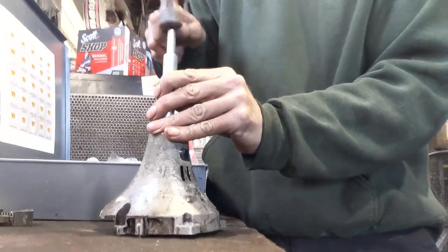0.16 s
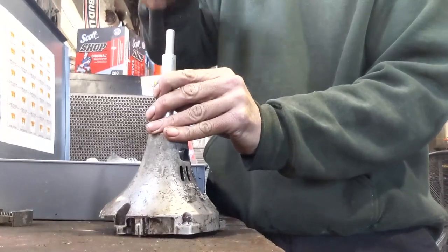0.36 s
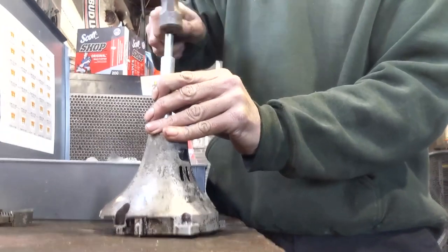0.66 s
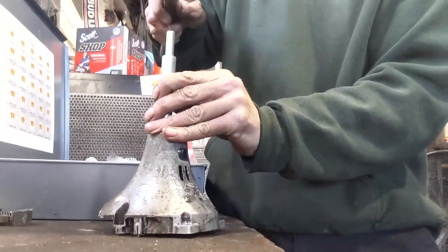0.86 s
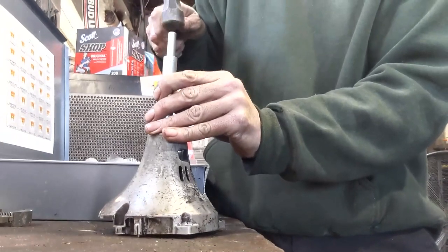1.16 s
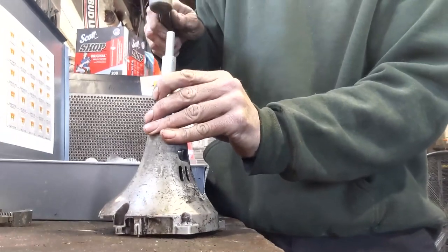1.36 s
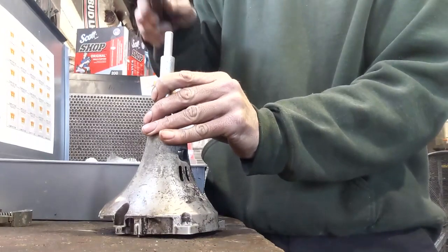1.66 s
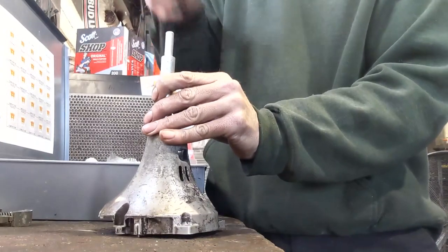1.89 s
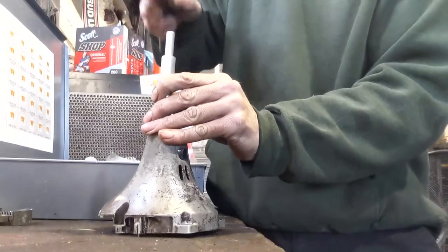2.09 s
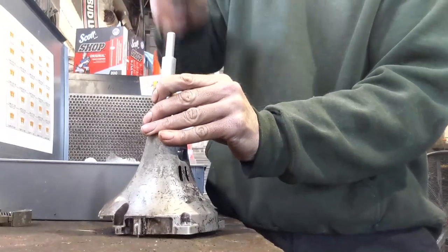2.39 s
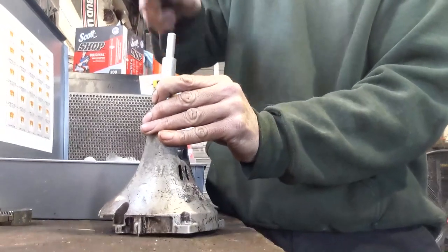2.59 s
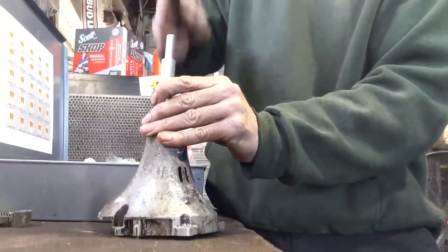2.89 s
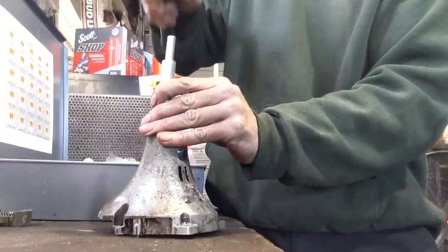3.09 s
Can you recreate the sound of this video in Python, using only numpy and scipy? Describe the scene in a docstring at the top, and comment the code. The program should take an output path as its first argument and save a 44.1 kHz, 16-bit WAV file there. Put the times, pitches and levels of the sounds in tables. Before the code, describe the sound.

Steel hammer blows on a punch, sharp metallic cracks with short ringing and boomy room echo

```python
"""Hammer and punch in a workshop

A steel hammer drives a metal punch into a cast housing on a workbench in a bare, echoing workshop.
Random impulses excite damped modes under a noise crack; five blows also bounce once, the head sings
on as decaying sines, a near wall slaps back, and noise dying band by band forms the echo over a floor.
The recorder turns loud passages down; slow swings and sudden jumps join its signal before overload."""
import sys
import numpy as np
from scipy import signal
from scipy.fft import rfft, irfft
from scipy.io import wavfile

SR = 44100
rng = np.random.default_rng(int(sys.argv[2]) if len(sys.argv) > 2 else 0)


def persist_wave(psi):
    """Save psi, clipped to +-1, as 16-bit WAV."""
    counts = np.round(np.clip(psi, -1, 1) * 32767).astype(np.int16)
    wavfile.write(sys.argv[1], SR, np.atleast_2d(counts).T)


N = 143325
PRE = SR // 2   # samples of lead-in, so that a blow before the start leaves its tail
M = N + PRE
T = (np.arange(M) - PRE) / SR   # time/s


def amp(db):
    """Level definition: an amplitude ratio is 10 to the power dB/20."""
    return 10 ** (np.asarray(db) / 20)


def at_hz(points, hz):
    """Logarithmic frequency scale: interpolate a table of (f/Hz, value) along it."""
    p = np.array(points, float)
    return np.interp(np.log(np.maximum(hz, 1)), np.log(np.maximum(p[:, 0], 1)), p[:, 1])


def clicks(s, size):
    """Impulse excitation: one sample of the given size at each time."""
    out = np.full(M, 1e-18)   # not quite zero, which keeps the filters fast
    out[(np.asarray(s) * SR).astype(int) + PRE] = size
    return out


def fade(x, t60):
    """Exponential decay: each impulse dies away by 60 dB in t60."""
    return signal.lfilter([1], [1, -amp(-60 / (t60 * SR))], x)


def ring(x, hz, t60):
    """Damped resonance: a unit impulse sets a decaying sine of initial height 1 ringing."""
    r, w = amp(-60 / (t60 * SR)), 2 * np.pi * hz / SR
    return signal.lfilter([0, np.sin(w)], [1, -2 * r * np.cos(w), r * r], x)


def noise_pair(gain):
    """Spectral shaping: two unrelated noises, jointly of rms 1, from a gain at each frequency."""
    spectra = rfft(rng.standard_normal((2, M))) * gain(np.fft.rfftfreq(M, 1 / SR))
    x = irfft(spectra, M)
    return x / x.std()


def coloured(spectrum):
    """Spectral density: noise follows a table of (f/Hz, relative level/dB)."""
    return noise_pair(lambda hz: amp(at_hz(spectrum, hz)))


# Hammer blows: t/s, contact strength/dB, chatter length/s, crack level/dB, broad echo level/dB,
# punch-pitched echo level/dB, echo treble slope/(dB per octave)
BLOW_TABLE = [(-.27, 8, .008, -5.5, -13, -25, 1), (0.206, 9.5, 0.0076, -7.5, -10.5, -22, 1),
              (0.689, 13, 0.012, -9, -8, -21.5, 1.5), (1.609, 4.5, 0.0092, -25, -26, -26.5, -1.5),
              (2.051, 12, .011, -9.5, -7, -30.5, 1.16), (2.524, 14, .006, -4, -7.5, -27, 1.48),
              (2.995, 14, 0.012, -12, -6.5, -20, 1.5)]
# How each blow lands: punch brightness/(dB per octave), extra level into the bench/dB
LANDING_TABLE = [(-2, 0), (1.4, 0), (2.6, 0.5), (-1.5, -0.5), (2, 1.5), (2.2, -2), (2.6, 0)]
# Bounces of the punch: t/s, contact strength/dB
BOUNCE_TABLE = [(0.238, 6), (.720, 7.5), (2.079, 12), (2.552, 7), (3.024, 5.5)]
BOUNCE_S, BOUNCE_CRACK_DB, BOUNCE_TILT_DB = 0.00067, -7.5, -1   # tilt in dB per octave
# Modes of punch and housing, damped by the hand: f/Hz, relative level/dB, t60/s
PUNCH_MODES = [(977, 6.5, 0.011), (1310, 0.5, 0.013), (2020, -11.5, 0.019), (3392, -11.5, .03),
               (5280, -2, 0.029), (5758, 1, 0.02), (6920, -6.5, 0.019), (7220, -2, 0.023),
               (7754, -1, 0.022), (8140, -5, 0.015), (9170, -11, 0.022), (10150, -11, .03),
               (11300, -24.5, .03), (14100, -5, .02)]
# Spectrum of the crack: f/Hz, relative level/dB
CRACK_SPECTRUM = [(88, -39), (150, -8), (1140, -6), (1650, -9), (3230, -13.5), (3850, -18), (10100, -12.5),
                  (14400, -18), (16500, -40)]
RISE_S, CRACK_FADE_S, PUNCH_DB = 0.00058, 0.0032, -19
CHATTER_PER_S = 3000   # mean rate of random impulses


def contact():
    """Impact excitation: chattering impulses drive the punch modes beneath a burst of noise."""
    out, hiss = np.zeros((2, M)), coloured(CRACK_SPECTRUM)
    hits = [(*blow[:4], landing[0]) for blow, landing in zip(BLOW_TABLE, LANDING_TABLE)]
    hits += [(s, db, BOUNCE_S, BOUNCE_CRACK_DB, BOUNCE_TILT_DB) for s, db in BOUNCE_TABLE]
    for s, db, length, crack_db, tilt_db in hits:
        part = slice(int(s * SR) + PRE, int((s + .2) * SR) + PRE)
        age = np.maximum(T[part] - s, 0)
        # the push rises, holds for the chatter length, then decays
        rise = np.minimum(age / RISE_S, 1) ** 2
        push = amp(db) * rise * np.exp(-np.maximum(age - length, 0) / CRACK_FADE_S)
        struck = rng.random(len(age)) < CHATTER_PER_S / SR
        chatter = push * rng.standard_normal((2, len(age))) * struck
        out[:, part] += amp(crack_db) * push * hiss[:, part]
        for hz, mode_db, t60 in PUNCH_MODES:
            level_db = PUNCH_DB + mode_db + tilt_db * np.log2(hz / 4000)
            out[:, part] += amp(level_db) * ring(chatter, hz, t60)
    return out


# Lines of the hammer head: f/Hz
HAMMER_HZ_TABLE = [1813, 1862, 3962, 4004, 6524, 9643, 13380]
# One row per line: family index, left level/dB, right level/dB (added to the family's), t60/s
HAMMER_LINES = [(0, -1, -14.5, 1.71), (0, -24.5, -13.5, 2.3), (1, -1.5, -37, 1.3), (1, 1.5, -15.5, 1.28),
                (2, 6, -24, 0.71), (3, 2.5, 7, 0.86), (4, 9.5, -16, 0.5)]
# One row per blow: starting level/dB of each of the five line families, lowest first
RING_LEVELS = [(-30, -36, -50, -55.5, -38), (-28.5, -40, -28.5, -48.5, -26),
               (-33.5, -36.5, -24.5, -44, -24.5), (-59, -71.5, -51, -79, -63),
               (-32.5, -36, -27, -40.5, -31), (-32.5, -37, -29, -36, -25.5), (-23.5, -34, -22, -35.5, -34)]


def hammer():
    """Free vibration: the head rings in thin lines, each blow stopping the old ring for a new one."""
    s, levels = np.transpose(BLOW_TABLE)[0], np.array(RING_LEVELS)
    last = np.maximum(np.searchsorted(s, T) - 1, 0)   # index of the latest blow
    age = np.maximum(T - s[last], 0)
    phase = rng.uniform(0, 2 * np.pi, (len(s), len(HAMMER_LINES)))
    out = np.zeros((2, M))
    for k, (hz, (family, left, right, t60)) in enumerate(zip(HAMMER_HZ_TABLE, HAMMER_LINES)):
        decay = amp(levels[last, round(family)] - 60 * age / t60)
        line = decay * np.sin(2 * np.pi * hz * age + phase[last, k])
        out += amp([[left], [right]]) * line
    return out


# Modes of the bench: f/Hz, relative level/dB, t60/s
BENCH_MODES = [(65.7, -25.5, .15), (105.1, -17.5, .2), (169, -26, 0.3), (241.2, -20, 0.17),
               (371, -26, 0.076)]


def bench():
    """Modal response: each blow kicks the low bench modes with random, mostly negative strength."""
    s, db = np.transpose(BLOW_TABLE)[:2]
    force = amp(db + np.transpose(LANDING_TABLE)[1])
    kicks = rng.normal(-0.7, 0.26, (len(s), 2, len(BENCH_MODES)))
    out = np.zeros((2, M))
    for k, (hz, mode_db, t60) in enumerate(BENCH_MODES):
        struck = np.array([clicks(s, force * kicks[:, side, k]) for side in range(2)])
        out += amp(mode_db) * ring(struck, hz, t60)
    return out


SLAP_S, SLAP_LOW_HZ, SLAP_HIGH_HZ, SLAP_DB = .0205, 635, 1120, -7.5


def wall_slap(direct):
    """Specular reflection: a near wall returns a delayed, band-limited copy of the contact."""
    wall = signal.butter(2, [SLAP_LOW_HZ, SLAP_HIGH_HZ], "band", fs=SR, output="sos")
    return amp(SLAP_DB) * np.roll(signal.sosfilt(wall, direct), int(SLAP_S * SR), axis=1)


# Spectrum of the broad echo: f/Hz, relative level/dB
ECHO_SPECTRUM = [(24, -20), (40, -2.5), (104, -0.5), (167, -5), (372, -7), (600, -7), (760, -2.5),
                 (1150, -16), (1720, -26), (2000, -21.5), (2450, -23.5), (2900, -28.5), (3740, -30),
                 (4700, -27), (6300, -23.5), (9690, -22), (12500, -33), (15500, -37.5), (16500, -44.5)]
# Decay of the long echo: f/Hz, t60/s
ECHO_DECAY = [(60, 0.76), (250, 0.77), (800, 0.83), (2500, 0.85), (6000, 0.63), (10000, 0.39),
              (15000, 0.45)]
EARLY_DB, EARLY_T60_S, BUILD_S = 3, 0.11, 0.012   # early part against the long one, build-up time
BLUR = 0.06   # width of a punch mode in the echo, as a share of its pitch


def punch_lines(hz):
    """Resonance curves: gain of noise gathered around the punch modes."""
    power = 0
    for f, db, _ in PUNCH_MODES:
        power = power + amp(2 * db) / f / (1 + ((hz - f) / (BLUR * f)) ** 2) ** 2
    return np.sqrt(power)


def workshop():
    """Diffuse reverberation: broad and punch-pitched noise dies band by band, early part over long."""
    s, broad_db, punch_db, treble_db = np.transpose(BLOW_TABLE)[[0, 4, 5, 6]]
    broad = [coloured(ECHO_SPECTRUM), coloured(ECHO_SPECTRUM)]
    pitched = [noise_pair(punch_lines), noise_pair(punch_lines)]
    edges = 35 * 2 ** np.arange(0, 9, 1 / 3)   # third-octave bands, Hz
    smooth = np.exp(-1 / (BUILD_S * SR))
    out = np.zeros((2, M))
    for k, (low, high) in enumerate(zip(edges, edges[1:])):
        hz = np.sqrt(low * high)
        band = signal.butter(2, [low, high], "band", fs=SR, output="sos")
        for db, noise in [(broad_db, broad), (punch_db, pitched)]:
            kick = clicks(s, amp(db + treble_db * np.log2(hz / 1000)))
            swell = fade(kick, at_hz(ECHO_DECAY, hz)) + amp(EARLY_DB) * fade(kick, EARLY_T60_S)
            envelope = signal.lfilter([1 - smooth], [1, -smooth], swell)
            out += envelope * signal.sosfilt(band, noise[k % 2])   # neighbours use separate noise
    return out


# Spectrum of the steady floor: f/Hz, relative level/dB
FLOOR_SPECTRUM = [(12, -29.5), (20, -12), (175, -24), (857, -37), (1670, -47), (1820, -39.5), (1980, -55),
                  (4070, -46), (15500, -58)]


def noise_floor():
    """Stationary noise: a steady coloured background, at -55.5 dB rms before the microphones."""
    return amp(-55.5) * coloured(FLOOR_SPECTRUM)


# Phase by which the left leads: f/Hz, phase/rad
PHASE_LEAD = [(0, 0), (350, -1.5), (1000, -0.14), (3600, 1.6), (5800, -6), (8000, -8), (16500, -31.5)]
# Likeness of left and right: f/Hz, share from 0 to 1
LIKENESS = [(40, 1), (300, 0.61), (1000, 0.46), (4000, 0.39), (12000, 0.23)]
# Left minus right: f/Hz, level difference/dB
LEFT_OVER_RIGHT = [(60, 4.5), (200, 1.5), (700, 6), (2400, 5), (6000, 5), (15000, 6)]


def microphones(pair):
    """Partial coherence: the right port mixes the left's phase-shifted sound with sound of its own."""
    hz = np.fft.rfftfreq(M, 1 / SR)
    left, own = rfft(pair)
    alike = np.clip(at_hz(LIKENESS, hz), 0, 1)
    shifted = left * np.exp(-1j * np.interp(hz, *np.transpose(PHASE_LEAD)))
    right = alike * shifted + np.sqrt(1 - alike ** 2) * own
    side = amp(at_hz(LEFT_OVER_RIGHT, hz) / 2)   # half the difference on each side
    return irfft(np.array([left * side, right / side]), M)


# Slow swings after each blow, before the high-pass:
# t/s, upswing height, upswing peak time/s, downswing height, downswing peak time/s
SWING_TABLE = [(-.27, 0.43, 0.011, 0.23, 0.045), (.206, 0.46, 0.014, 0.27, 0.058),
               (0.692, 0.58, 0.0074, 0.17, 0.07), (1.611, -0.11, 0.013, -0.037, 0.043),
               (2.055, 0.64, 0.025, 0.28, 0.072), (2.525, 0.47, 0.0087, 0.21, 0.076),
               (2.997, 0.43, 0.012, 0.18, 0.064)]
# Sudden jumps, before the high-pass: t/s, left height, right height, rise/s, fall/s
JUMP_TABLE = [(0.199, 0.24, 0.035, .0003, .02), (1.369, -0.036, -0.03, 0.00021, 0.042),
              (2.0437, 0.23, 0.0, 0.00041, 0.018), (2.514, 0.26, 0.01, 0.0012, 0.023)]
RIGHT_HEIGHT, RIGHT_TIME, COUPLING_HZ = 0.88, 0.91, 1   # right swings: share of height and of time


def lurch():
    """High-pass coupling: a quick upswing, a slower downswing and sudden jumps pass through it."""
    out = np.zeros((2, M))
    for s, up, up_s, down, down_s in SWING_TABLE:
        age = np.maximum(T - s, 0) / [[1], [RIGHT_TIME]]
        upswing = up * (age / up_s * np.exp(1 - age / up_s)) ** 2
        downswing = down * age / down_s * np.exp(1 - age / down_s)
        out += [[1], [RIGHT_HEIGHT]] * (upswing - downswing)
    for s, left, right, rise, fall in JUMP_TABLE:
        age = np.maximum(T - s, 0)
        jump = (1 - np.exp(-age / rise)) * np.exp(-(age / fall) ** 2)
        out += np.outer([left, right], jump)
    return signal.lfilter(*signal.butter(1, COUPLING_HZ, "high", fs=SR), out)[:, PRE:]


def scene():
    """Superposition: microphone sound and the hammer's own stereo lines add, without the lead-in."""
    direct = contact()
    heard = microphones(direct + wall_slap(direct) + bench() + workshop() + noise_floor())
    return (heard + hammer())[:, PRE:]


THRESHOLD_DB, SQUEEZE = -39.5, 0.39   # SQUEEZE: dB of cut per dB above the threshold
LEVEL_FALL_DB_PER_S, LISTEN_S, ATTACK_S = 119, 0.02, 0.0027
TOP, CUTOFF_HZ = 0.48, 16900   # overload ceiling, top cut


def lag(x, s):
    """First-order relaxation: follow x with time constant s, starting from its opening mean."""
    r = np.exp(-1 / (s * SR))
    return signal.lfilter([1 - r], [1, -r], x, zi=[r * np.mean(x[:400])])[0]


def record(dry):
    """Compression and saturation: late gain control, steady release, lurch, soft overload, top cut."""
    level = 10 * np.log10(lag(np.mean(dry ** 2, 0), LISTEN_S) + 1e-12)
    # the held level rises at once but falls at a steady rate
    ramp = LEVEL_FALL_DB_PER_S * np.arange(N) / SR
    held = np.maximum.accumulate(level + ramp) - ramp
    cut_db = lag(SQUEEZE * np.maximum(held - THRESHOLD_DB, 0), ATTACK_S)
    driven = dry * amp(-cut_db) + lurch()
    overloaded = TOP * np.tanh(driven / TOP)
    top_cut = signal.cheby2(12, 70, CUTOFF_HZ, fs=SR, output="sos")
    return signal.sosfilt(top_cut, overloaded)


dry = scene()
out = record(dry)
persist_wave(out)
```